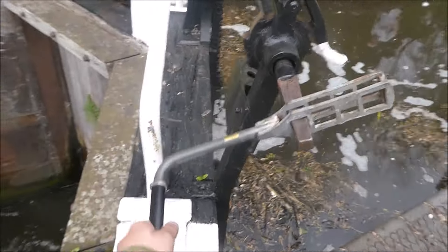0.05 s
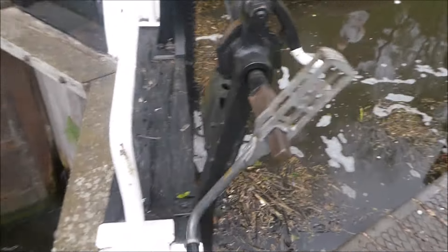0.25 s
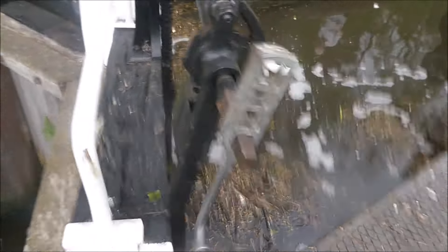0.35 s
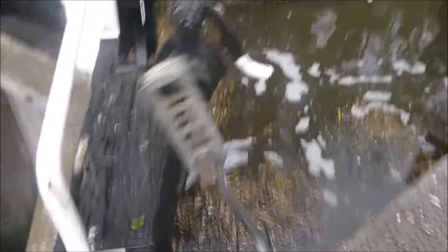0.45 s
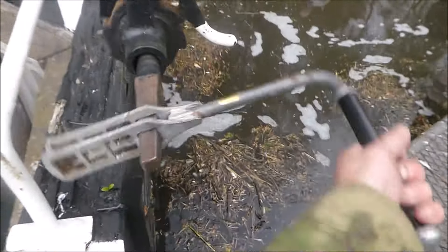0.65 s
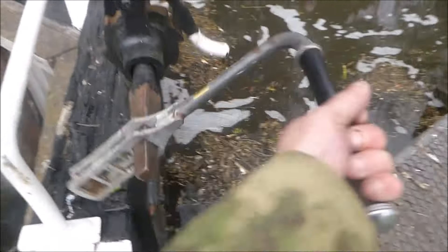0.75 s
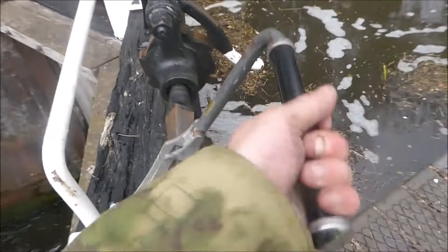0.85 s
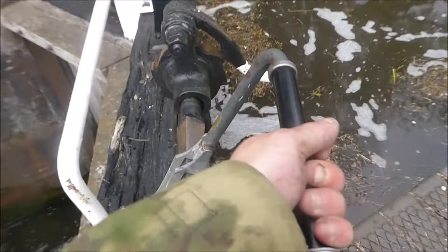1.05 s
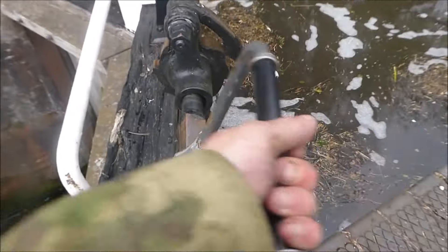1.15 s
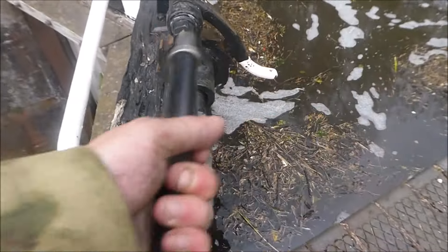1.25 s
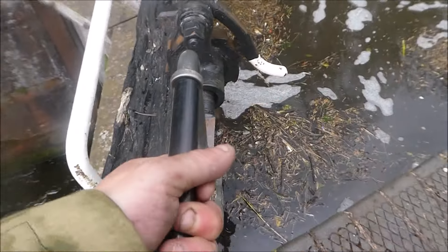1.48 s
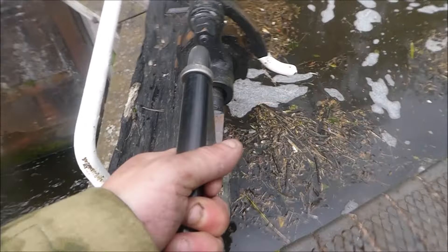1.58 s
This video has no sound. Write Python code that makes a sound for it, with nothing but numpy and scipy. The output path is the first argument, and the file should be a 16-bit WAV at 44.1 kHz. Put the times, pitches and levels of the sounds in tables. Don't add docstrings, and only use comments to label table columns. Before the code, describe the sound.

Metal ratchet pawl clacks unevenly over gear teeth as a hand crank turns beside water

```python
import sys
import numpy as np
from scipy import signal
from scipy.fft import rfft, irfft, next_fast_len
from scipy.io import wavfile
from scipy.ndimage import uniform_filter1d, map_coordinates

SR = 44100
rng = np.random.default_rng(int(sys.argv[2]) if len(sys.argv) > 2 else 0)


def voltage_ratio(decibels):
    exponent = np.asarray(decibels, float) / 20
    return 10 ** exponent


def unload_wav(signal):
    wavfile.write(
        sys.argv[1],
        SR,
        np.round(np.clip(np.atleast_2d(signal).T, -1, 1) * 32767).astype(np.int16),
    )


N = 70560
RING_TIME = np.arange(SR // 5) / SR


def unit(x):
    return x / np.sqrt(np.mean(x ** 2) + 1e-20)


def along(points, hz, order=1):
    rows = np.transpose(points)
    return np.interp(np.log(hz + 1), np.log(rows[0] + 1), rows[order])


def curve(rows):
    return np.interp(np.arange(N) / SR, *np.transpose(rows))


def wobble(rate):
    knots = rng.standard_normal(int(N * 200 / SR) + 4)
    return map_coordinates(knots, [np.arange(N) * min(rate, 200) / SR])


def filtered(x, response):
    m = next_fast_len(N + SR // 4)
    return irfft(rfft(x, m) * response(np.fft.rfftfreq(m, 1 / SR)), m)[..., :N]


def resonances(rows):
    def response(f):
        total = 0
        for k, (centre, width, db) in enumerate(rows):
            damping = 1j * f * width
            total = total + (-1) ** k * voltage_ratio(db) * damping / (centre * centre - f * f + damping)
        return total
    return response


def rush(spectrum, patchy_db):
    z = signal.stft(rng.standard_normal(N), nperseg=512)[2]
    field = uniform_filter1d(uniform_filter1d(rng.standard_normal(z.shape), 6, 0), 10, 1)
    x = signal.istft(z * voltage_ratio(patchy_db * unit(field)), nperseg=512)[1][:N]
    return unit(filtered(x, lambda hz: voltage_ratio(along(spectrum, hz))))


def add(track, s, piece):
    track[round(s * SR):][:len(piece)] += piece


def fade(db, t60):
    return voltage_ratio(db - 60 * RING_TIME / t60)


def onset(rise_s):
    return 1 - np.exp(-RING_TIME / rise_s)


def pawl():
    # start_s, edgewise_db, flat_low_db, flat_high_db, tip_db
    contacts = [(.2152, -51, -41, -28.5, -31), (.2232, -49, -53, -38, -33), (.248, -72, -70, -66, -68),
                (.254, -49.5, -62, -67, -70), (0.2638, -53, -61, -50, -57), (0.4779, -29, -30.5, -44, -53),
                (.4817, -32.5, -33.5, -32, -54), (0.4894, -36.5, -41, -36, -43), (.513, -40, -45, -59, -66),
                (.524, -63, -73, -63, -66), (0.6339, -28, -36, -31, -38), (0.6363, -31, -32, -30, -31),
                (0.6468, -41.5, -34, -54, -44), (0.6568, -60, -42, -40, -58), (0.669, -64, -46, -55, -58),
                (.6757, -39.5, -47, -54, -64), (0.692, -57, -50, -63, -72), (.7568, -54, -38, -22, -34),
                (0.7652, -39, -38, -30.5, -37), (0.78, -39, -38, -41.5, -43), (.788, -38, -45, -32, -50),
                (0.816, -47, -49, -51, -66), (.83, -57, -47.5, -62, -75), (.8776, -45, -28.5, -23.5, -30.5),
                (0.8855, -49, -47, -33.5, -23), (.8925, -55, -50, -34, -43), (.9005, -60, -42, -34.5, -53),
                (.91, -66, -57, -49, -44), (0.926, -54, -62, -56, -66), (1.3106, -32, -38, -41, -56),
                (1.3127, -34.5, -32.5, -34, -54), (1.3205, -36.5, -38, -37, -36.5),
                (1.348, -71, -70, -67, -68), (1.356, -51.5, -57, -62, -72), (1.382, -53.5, -72, -72, -74)]
    # pitch_hz, level_db, t60_s
    edgewise = [(3804, 0, .11), (7433, -2, .06), (7036, -14, .025), (12375, -14, .05), (10580, -20, .03)]
    flat_low = [(5456, 0, .12), (5760, -8, .015), (1340, -15, .11)]
    flat_high = [(5585, 0, .07), (6200, -12, .01)]
    tip = [(9785, 0, .045), (10210, -12, .04)]
    # start_s, level_db, t60_s
    scrapes = [
        (.7238, -33, .012),
        (.7265, -35, .025),
        (.996, -50, .02),
    ]
    # freq_hz, level_db
    crack_colour = [(600, -5), (1500, -5), (4000, -5), (8300, -0.5), (12500, -5.5), (15000, -23),
                    (16000, -31)]
    # freq_hz, level_db
    dull_colour = [(600, -16.5), (1500, -19), (3200, -0.5), (4400, -7.5), (6000, 6), (8300, -7.5),
                   (10000, -26), (13000, -45)]
    scatter_db, drift_turns = 0.06, 0.05
    damp_db, damp_s = -15, 0.0026
    hardness = 0.45
    dull_db = -5

    ring, sharp, dull = np.zeros((3, N + SR))
    t = RING_TIME
    rise = onset(0.00027)
    noise_fade = fade(-2, 0.014) + fade(-13.5, 0.021)
    luck = rng.standard_normal((len(contacts), 40))
    drift = drift_turns * np.array([wobble(120) for _ in range(4)])
    next_starts = [row[0] for row in contacts[1:]] + [9]
    for (s, *levels), next_s, draw in zip(contacts, next_starts, luck):
        first = round(s * SR)
        modes = []
        for family, level in zip((edgewise, flat_low, flat_high, tip), levels):
            modes += [(hz, db + level, t60) for hz, db, t60 in family]
        tone = 0
        for k, (hz, db, t60) in enumerate(modes):
            path = drift[k % 4, first:][:len(t)]
            turns = hz * t + path - path[0]
            tone = tone + fade(db + scatter_db * draw[k], t60) * np.sin(2 * np.pi * turns)
        choke = voltage_ratio(damp_db * np.clip((t - next_s + s) / damp_s, 0, 1))
        add(ring, s, tone * rise * choke)
        for track, level in ((sharp, levels[0]), (dull, levels[2])):
            add(track, s, rise * voltage_ratio(level + hardness * (level + 32.5)) * noise_fade)
    for s, db, t60 in scrapes:
        add(dull, s, fade(db, t60) * onset(0.0017))
    crack = sharp[:N] * rush(crack_colour, patchy_db=-2.5)
    return ring[:N] + crack + voltage_ratio(dull_db) * dull[:N] * rush(dull_colour, patchy_db=-1.0)


def crank():
    # start_s, level_db, t60_s
    hums = [
        (0.214, -39, 0.045),
        (0.478, -49.5, 0.21),
        (0.632, -49, 0.35),
        (.645, -48.5, 0.4),
        (0.724, -29, 0.015),
        (.758, -72, 0.11),
        (0.778, -48, 0.074),
        (0.816, -52.5, 0.28),
        (.878, -60, 0.16),
        (1.315, -45.5, 0.19),
    ]
    pitch_hz = 1779
    hum = np.zeros(N + SR)
    for s, db, t60 in hums:
        add(hum, s, fade(db, t60) * onset(0.0041) * np.sin(2 * np.pi * pitch_hz * (s + RING_TIME)))
    return hum[:N]


def pin():
    # start_s, pitch_hz, level_db, t60_s
    pin_rings = [(.217, 2895, -41, .06), (.224, 9107, -50, .15), (.223, 14050, -51, .05),
                 (.481, 2895, -47, .2), (.482, 9107, -35, .11), (.488, 14310, -52, .06),
                 (.523, 9107, -54, .07), (.482, 7433, -33, .05), (.635, 2895, -44, .12),
                 (.634, 9107, -45, .12), (.636, 14280, -52, .04), (.758, 2895, -39, .3),
                 (.758, 10210, -44, .06), (.765, 10210, -40, .05), (.765, 13900, -56, .03),
                 (.758, 9107, -53, .2), (.788, 9107, -45, .11), (.636, 12375, -43, .07),
                 (.7568, 6150, -34, .012), (.878, 3300, -38, .02), (.88, 2895, -42, .17),
                 (.882, 3804, -42, .45), (.884, 9107, -45, .09), (.884, 14030, -48, .06),
                 (.886, 14310, -54, .04), (.89, 10210, -44, .06), (.9005, 7433, -43, .04),
                 (1.312, 2895, -43, .09), (1.312, 9107, -52, .15), (1.313, 14045, -52, .06),
                 (1.318, 10210, -47, .06)]
    stops = [.255, .512, .7, 0.785, .823, .935, 1.36]
    ring = np.zeros(N + SR)
    for s, hz, db, t60 in pin_rings:
        left_s = min([stop - s for stop in stops if stop > s], default=1)
        stilled = voltage_ratio(-20 * np.clip((RING_TIME - left_s) / 0.0024, 0, 1))
        add(ring, s, fade(db, t60) * stilled * onset(0.00033) * np.sin(2 * np.pi * hz * RING_TIME))
    return ring[:N]


def ticks():
    # start_s, level_db, brightness_db
    tick_hits = [(.2155, -20, -30), (0.2236, -30, -13), (0.4789, -17, -20), (0.4814, -16, -13),
                 (.4827, -33, -5), (.513, -27, -4), (0.5138, -32, -25), (.6345, -31, -8), (.637, -24, -3),
                 (0.677, -36, 0), (.7243, -28, -16), (0.727, -48, -15), (.7573, -42, -9), (0.765, -22, -5),
                 (0.79, -37, -3), (0.8782, -27, -25), (.901, -33, -3), (0.997, -48, -40), (1.3108, -30, -8),
                 (1.3127, -31, -13), (1.3244, -34, -10)]
    t60_s = 0.002
    dull, bright = np.zeros((2, N + SR))
    t = np.arange(SR // 100) / SR
    for s, db, bright_db in tick_hits:
        snap = rng.standard_normal(len(t))
        piece = voltage_ratio(db - 60 * t / t60_s) * snap / np.abs(snap[:8]).max()
        add(dull, s, piece)
        add(bright, s, voltage_ratio(bright_db) * piece)
    body = filtered(dull[:N], resonances([(4500, 7000, 0)]))
    return body + filtered(bright[:N], resonances([(12800, 3000, 0)]))


def housing():
    # start_s, level_db, pitch_hz, t60_s, upper_db
    thuds = [(0.101, -44, 205, 0.12, -54.5), (0.217, -37.5, 380, 0.13, -33.5),
             (0.248, -19.5, 314, 0.012, -47), (.262, -27, 420, 0.025, -62), (.303, -36, 290, 0.017, -54),
             (0.481, -39.5, 350.5, 0.17, -31.5), (0.586, -43, 236.5, 0.19, -82),
             (0.636, -42, 366, 0.06, -39.5), (.658, -40.5, 291.5, 0.13, -43),
             (0.729, -33, 320, 0.052, -39.5), (0.757, -45.5, 426.7, 0.25, -37),
             (0.787, -29, 291, 0.074, -40.5), (.81, -45, 276, 0.054, -46), (0.88, -28.5, 340, 0.049, -36),
             (0.9988, -26.5, 337, 0.043, -44), (1.026, -19, 300, 0.01, -82),
             (1.057, -29.5, 260, 0.016, -69), (1.318, -37.5, 373, 0.083, -35.5)]
    # centre_hz, width_hz, level_db
    upper_modes = [(540, 100, -6.5), (820, 137, 1), (1147, 41, 1.5), (1301, 42, -0.5), (2440, 2850, -11)]
    low, high = np.zeros((2, N + SR))
    rise = onset(0.0043)
    for s, db, hz, t60, upper_db in thuds:
        phase = 2 * np.pi * hz * RING_TIME
        tone = np.sin(phase) + voltage_ratio(-5) * np.sin(1.35 * phase)
        tone = tone + fade(-7, t60) * np.sin(2.05 * phase)
        add(low, s, rise * fade(db, t60) * tone)
        add(high, s, rise * fade(upper_db, 0.089))
    return low[:N] + high[:N] * unit(filtered(rng.standard_normal(N), resonances(upper_modes)))


def walls(x):
    # freq_hz, t60_s
    wall_decay = [(300, 0.55), (3000, 0.19), (12000, 0.025)]
    hz, t, z = signal.stft(rng.standard_normal(SR // 4), SR, nperseg=256)
    tail = signal.istft(z * voltage_ratio(-60 * t / along(wall_decay, hz)[:, None]), SR, nperseg=256)[1]
    delayed = np.pad(x, (300, 0))
    return signal.fftconvolve(delayed, tail / np.linalg.norm(tail))[:N]


def grumble():
    # time_s, level_db
    load = [(0.0, -54), (0.654, -50), (0.872, -51.5), (1.032, -54.5), (1.6, -52.5)]
    # freq_hz, level_db_per_hz
    grind_colour = [(25, -20), (100, -18), (170, -5.5), (250, 2), (420, -2), (560, -8), (950, -7.5),
                    (1500, -19)]
    lumps = voltage_ratio(3 * wobble(37) + 0.09 * wobble(11.5))
    grind = rush(grind_colour + [(3000, -40)], patchy_db=0.0)
    return voltage_ratio(curve(load)) * unit(lumps * grind)


def water():
    # time_s, level_db
    flow = [(0.0, -54.5), (0.778, -56), (0.976, -59), (1.184, -58.5), (1.6, -57)]
    # freq_hz, level_db_per_hz
    spray_colour = [(600, -17), (1000, -13.5), (2000, -14), (6000, -15), (8200, -19), (9800, -13),
                    (15200, -24), (15600, -60)]
    return voltage_ratio(curve(flow) + 0.29 * wobble(10.07)) * rush([(250, -10)] + spray_colour, patchy_db=0.3)


def port_pair(whole):
    # freq_hz, left_over_right_db, right_lead_rad, stray_db
    ports = [(70, 9, 1, -13), (200, 13.5, 0.5, -12), (380, 21.5, -1.5, 0), (495, 22, 2, -2),
             (653, 10, 2.5, -3), (1240, 5, 3, -41), (2290, -0.5, 2, -24), (5550, 1, 1.5, -30),
             (9800, 2.5, 1.13, -15), (14200, 6, 1.17, -5)]

    def right_over_left(hz):
        return voltage_ratio(-along(ports, hz)) * np.exp(1j * along(ports, hz, order=2))

    def stray_gain(hz):
        ratio = right_over_left(hz)
        return abs(2 * ratio / (1 + ratio)) * voltage_ratio(along(ports, hz, order=3))

    left = filtered(whole, lambda hz: 2 / (1 + right_over_left(hz)))
    stray = filtered(grumble() + water(), stray_gain)
    return np.array([left - stray, 2 * whole - left + stray])


def scene():
    hits = pawl() + crank() + pin() + ticks() + housing()
    echo = voltage_ratio(-24) * walls(hits)
    return port_pair(hits + echo + grumble() + water())


def band_limit(x):
    return signal.sosfilt(signal.butter(12, 16300, fs=SR, output="sos"), x)


def record(dry):
    low_cut_hz, top_hz = 69, 16150

    def band(hz):
        return (hz < top_hz) * (1j * hz / (1j * hz + low_cut_hz)) ** 2

    mix = filtered(dry, band)
    return band_limit(mix)


dry = scene()
out = record(dry)
unload_wav(out)
```